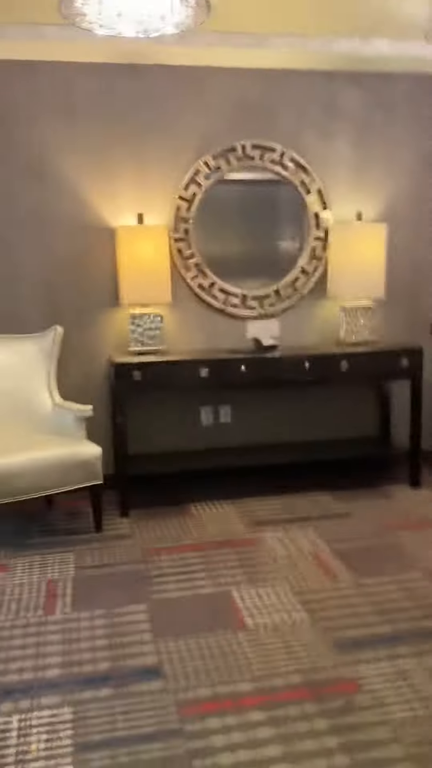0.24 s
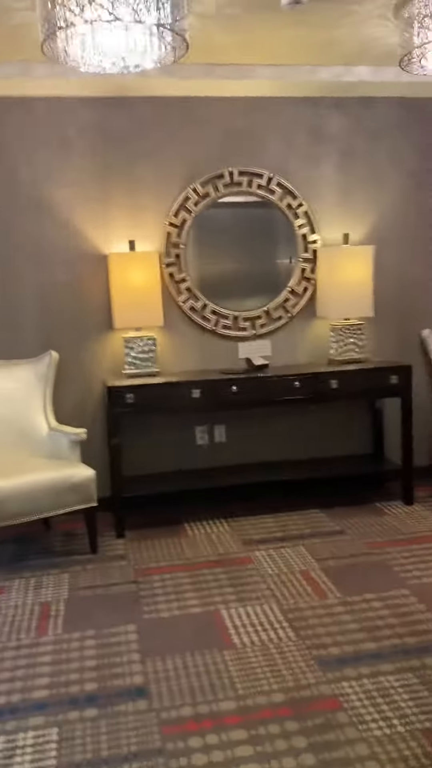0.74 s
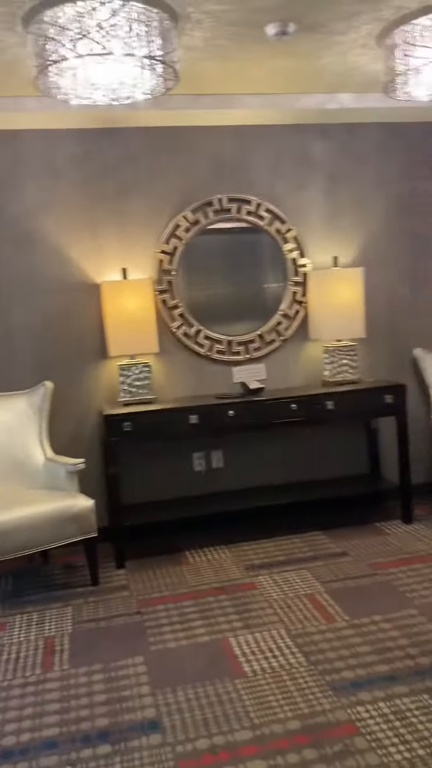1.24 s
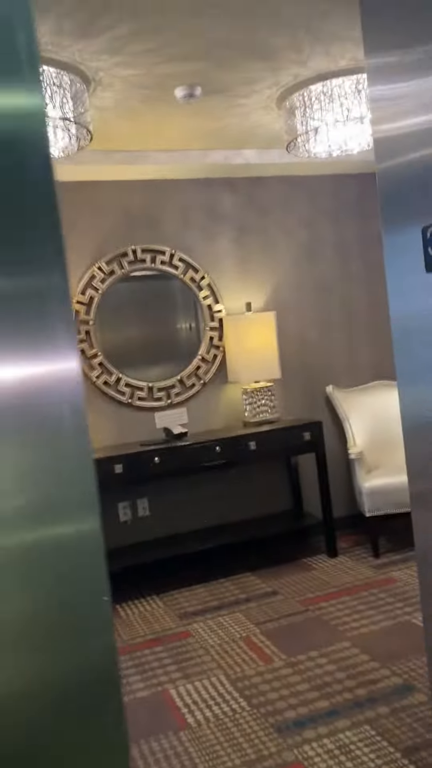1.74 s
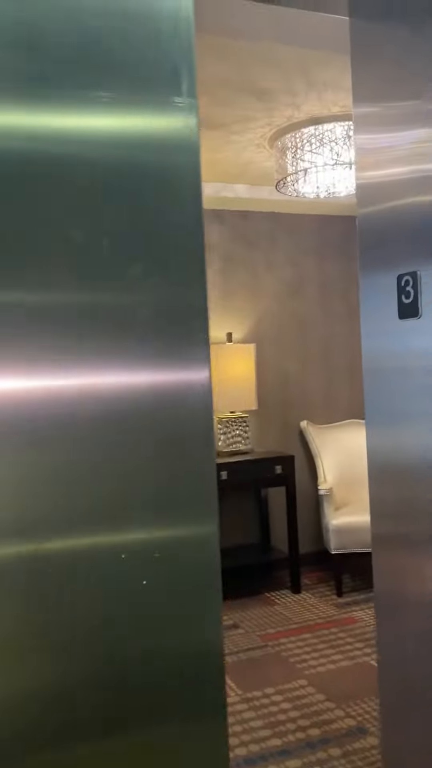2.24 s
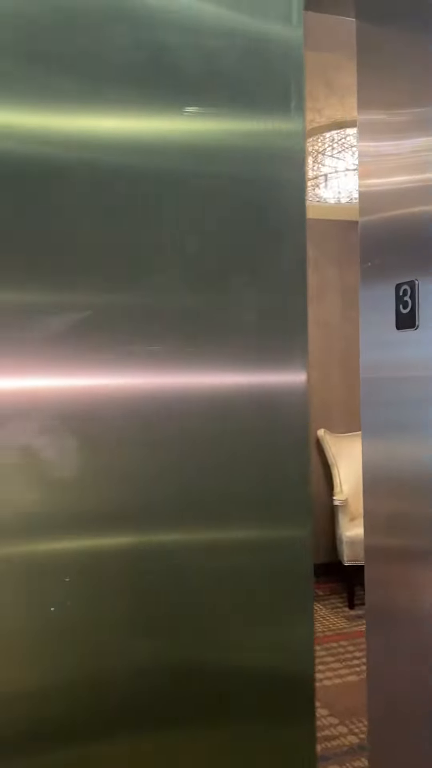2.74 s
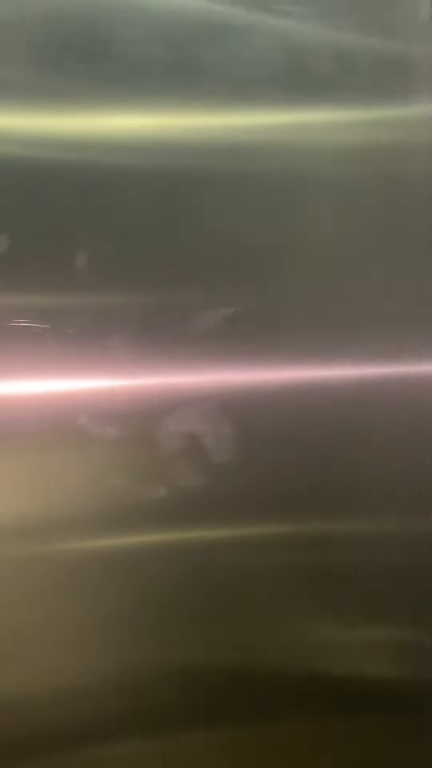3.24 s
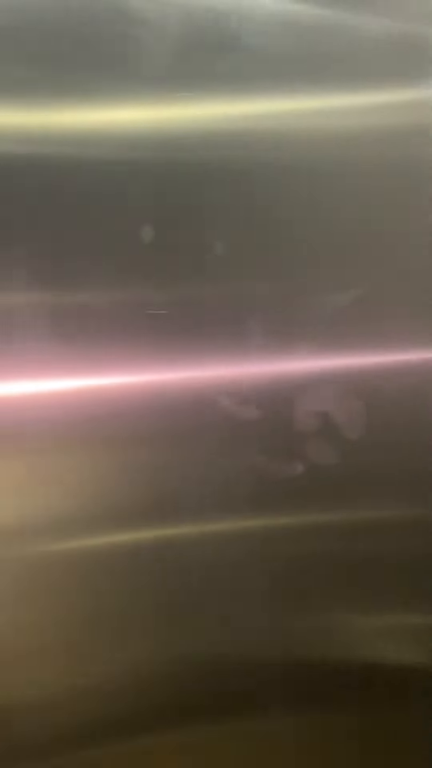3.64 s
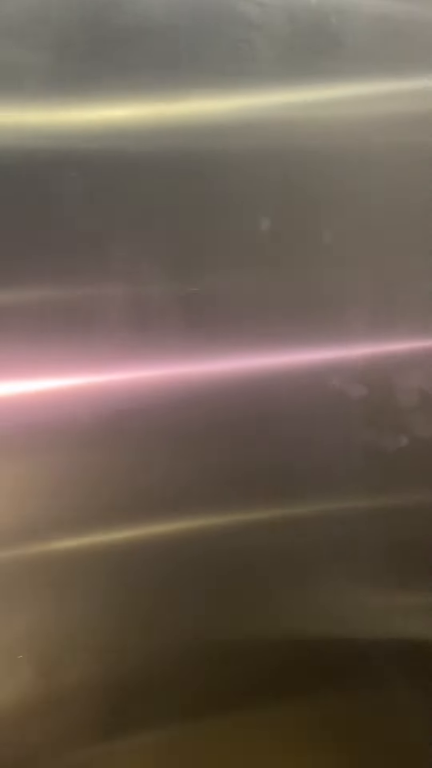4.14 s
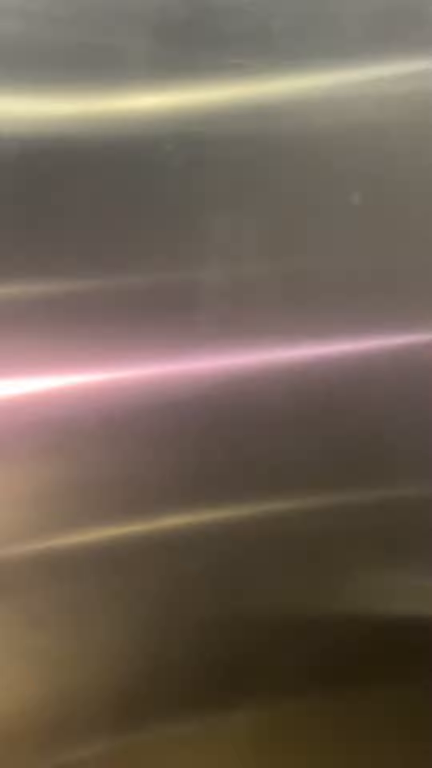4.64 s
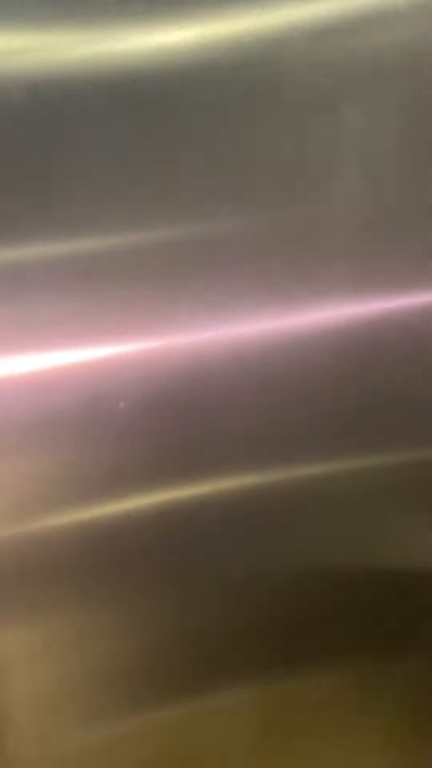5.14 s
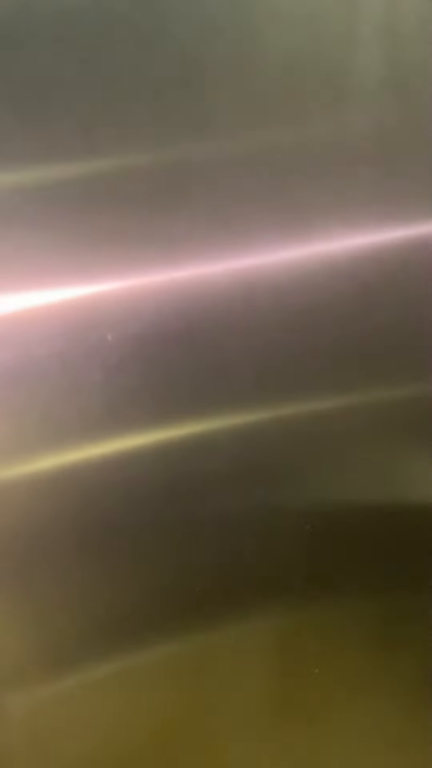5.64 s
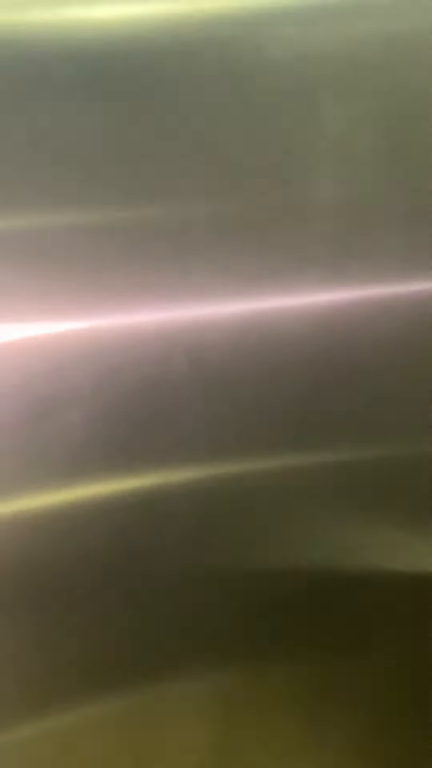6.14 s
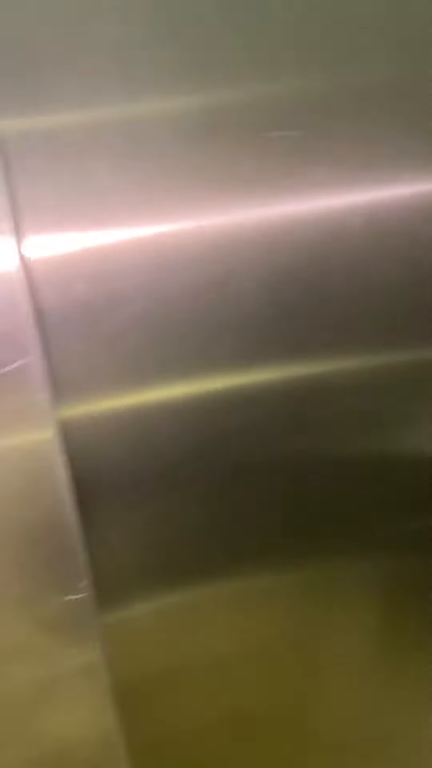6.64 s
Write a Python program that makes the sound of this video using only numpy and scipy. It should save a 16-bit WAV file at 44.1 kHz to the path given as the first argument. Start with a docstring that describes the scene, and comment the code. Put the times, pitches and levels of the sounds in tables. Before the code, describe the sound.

Low fan drone and soft hiss in a lift cabin, cloth rustles and small ticks, dull door bumps, then one sharp metallic clack.

```python
"""Inside a lift car: the ceiling fan hums (blade-rate sines) and blows (coloured noise ringing in the air).
The sliding door rumbles shut along its track (noise shaking resonances, with dull low bumps), then its
latch snaps home (noise crack, ringing panel modes, dying rattle). Clothes rustle as lifts of the hiss,
small parts tick as noise bursts, fingers thud as damped sines near a hand-held two-port microphone."""
import sys
import numpy as np
from scipy import signal
from scipy.fft import rfft, irfft, next_fast_len
from scipy.io import wavfile
from scipy.ndimage import uniform_filter1d

SR = 44100
rng = np.random.default_rng(int(sys.argv[2]) if len(sys.argv) > 2 else 0)


def transcribe(signal):
    """Save signal, clipped to [-1, 1], as a 16-bit WAV file at the path in sys.argv[1]."""
    frames = np.atleast_2d(signal).T
    limited = np.clip(frames, -1, 1)
    pcm = np.round(limited * 32767).astype(np.int16)
    wavfile.write(sys.argv[1], SR, pcm)


N = 303849
T = np.arange(N) / SR


def amp(db):
    """Decibels to gain."""
    return 10 ** (np.asarray(db) / 20)


def evened(x):
    """Scales to rms 1."""
    return x / np.sqrt(np.mean(x ** 2) + 1e-20)


def read(points, hz, axis=1):
    """Reads a column of a table over log frequency."""
    table = np.transpose(points)
    return np.interp(np.log(hz + 1), np.log(table[0] + 1), table[axis])


def curves(table):
    """Every column of a time table, sample by sample."""
    s, *columns = np.transpose(table)
    return [np.interp(T, s, c) for c in columns]


def wander(rate_hz):
    """Smooth random drift of rms 1: 16 sines up to rate_hz, weaker as they get faster."""
    t = T[::64]
    drift = sum(np.sin(2 * np.pi * (f * t + rng.random())) / np.sqrt(f)
                for f in np.geomspace(rate_hz / 20, rate_hz, num=16))
    return np.interp(T, t, evened(drift))


def swell(middle_s, length_s):
    """A smooth hump of height 1."""
    start = max(round((middle_s - length_s / 2) * SR), 0)
    part = slice(start, round((middle_s + length_s / 2) * SR))
    out = np.zeros(N)
    out[part] = np.cos(np.pi * (T[part] - middle_s) / length_s) ** 2
    return out


def noise(shape, size, patchy_db, tilt_db=0., hinge_hz=1000., span_octaves=1.):
    """Two unrelated noise fields of one colour with drifting patches; tilt_db moves the part above the hinge."""
    hop = size // 4
    frames, hz = N // hop + 5, np.fft.rfftfreq(size, 1 / SR)
    a, b, c, d, patch = rng.standard_normal((frames, len(hz), 5)).T
    patch = uniform_filter1d(patch, size=7, axis=0)
    patch = evened(uniform_filter1d(patch, size=9, axis=1))
    tilt = np.interp(np.arange(frames) * hop, np.arange(N), tilt_db + np.zeros(N))
    upper = np.clip(np.log2(hz / hinge_hz + 1e-9) / span_octaves, 0, 1)
    outside = (hz < shape[0][0]) | (hz > shape[-1][0])
    base = amp(np.where(outside, -120, read(shape, hz)))
    gain = base[:, None] * amp(patchy_db * patch + upper[:, None] * tilt)
    spectra = np.array([a + 1j * b, c + 1j * d]) * gain
    out = signal.istft(spectra, nperseg=size, noverlap=size - hop)[1][:, :N]
    return out / np.linalg.norm(base)  # near rms 1 before the tilt


def resonate(x, hz, width_hz):
    """A steep fixed resonance of gain 1: shift to 0 Hz, low-pass with a double pole, shift back."""
    turn, r = np.exp(2j * np.pi * hz * T[:x.shape[-1]]), np.exp(-np.pi * width_hz / SR)
    slow = signal.lfilter([(1 - r) ** 2], [1, -2 * r, r * r], x / turn)
    return 2 * (turn * slow).real


def modes(table, shake):
    """Noise ringing in a set of resonances, rms 1."""
    return evened(sum(amp(db) * evened(resonate(shake, hz, w)) for hz, w, db in table))


def steadied(x, window_s, share):
    """Evens out part of the chance swell of a narrow noise, so that it sounds driven."""
    power = uniform_filter1d(x ** 2, round(window_s * SR))
    return evened(x / (abs(power) + 1e-3) ** (share / 2))


def draught():
    """Fan air roaring in the car's low modes, hiss lifted by rustling cloth, and microphone hiss."""
    # fan draught colour: hz, relative_db_per_hz
    air_colour = [(76, -33.5), (130, -6), (156, -9.5), (274, -0.5), (330, -4.5), (401, -5.5), (477, -2.5),
                  (528, -4), (642, -16), (779, -18), (909, -26.5), (1060, -22.5), (1210, -30), (1500, -38),
                  (1950, -63.5), (3300, -120)]
    # draught strength: time_s, level_db
    air_level = [(0, -39.5), (.8, -39), (1.6, -36.5), (2.8, -35.5), (3.2, -38), (3.7, -34), (4.8, -34),
                 (5.1, -35.5), (6.5, -36.5), (6.89, -37.5)]
    # air resonances of the car: pitch_hz, width_hz, relative_db
    car_modes = [(240.7, 11, -9), (293.4, 8.4, -7), (363.9, 14, -10), (435, 33, -12), (593, 11, -15),
                 (699.2, 18, -16), (782, 15, -28), (1054, 61, -22.5)]
    # air hiss and rustle colour: hz, relative_db_per_hz
    hiss_colour = [(900, -10.5), (1400, 0.5), (2200, -0.5), (3200, -1.5), (4800, -9.5), (6000, -13.5),
                   (7500, -18), (10000, -24), (12500, -25.5), (14400, -27.5), (15500, -45)]
    # hiss before the rustles: time_s, level_db, brightness_db
    hiss_level = [(0, -58, -7), (1.2, -56, -2), (1.9, -55, -5), (2.6, -55, -2), (4.4, -56, -6.5),
                  (5.2, -57, -0.5), (6.1, -55.5, -11.5), (6.3, -58, -14.5), (6.89, -58.5, -6)]
    # cloth rustles: middle_s, length_s, lift_db, brightening_db
    rustles = [(.42, 0.29, 4.5, 6.5), (0.573, 0.062, -0.5, 9), (0.733, 0.085, 3.5, 2),
               (0.832, 0.11, 0.5, 10), (1.01, 0.24, 4, 2.5), (1.33, 0.23, 1.5, 1), (2.238, 0.47, 3, 3),
               (2.433, 0.4, 1.5, 4), (3.33, 0.066, 0.5, 11.5), (3.566, 0.17, 1, 4), (3.78, 0.27, 0, 9),
               (4.16, 0.32, 3, 8), (4.334, 0.052, 1.5, 6), (4.437, .08, -1, 5), (4.602, 0.23, 4.5, 6.5),
               (5.35, 0.27, 3, 3), (5.555, 0.46, 1, 5), (5.86, 0.19, 5.5, 6.5)]
    # microphone hiss colour: hz, relative_db_per_hz
    self_noise = [(4000, -3.5), (7000, -0.5), (11000, -4.5), (14000, -6.5), (15500, -20.5)]

    roar = noise(air_colour, size=2048, patchy_db=2.03, tilt_db=4, hinge_hz=518.0, span_octaves=0.14)
    roar = roar + amp(-6.5) * modes(car_modes, rng.standard_normal((2, N)))
    roar = amp(curves(air_level)[0]) * roar

    level_db, bright_db = curves(hiss_level)
    for middle_s, length_s, lift_db, brightening_db in rustles:
        hump = swell(middle_s, length_s)
        level_db = level_db + lift_db * hump
        bright_db = bright_db + brightening_db * hump
    bright_db = bright_db + 1.5 * wander(12.)  # treble flicker
    hiss = noise(hiss_colour, size=256, patchy_db=1.57, tilt_db=bright_db, hinge_hz=4800.0, span_octaves=0.34)
    return roar + amp(level_db) * hiss + amp(-84.0) * noise(self_noise, size=256, patchy_db=5.0)


def machine_tones():
    """Thin whines from the drive: sines wavering in level and phase, each faded in over 0.11 s."""
    # start_s, pitch_hz, level_db
    whines = [(6.3, 10993, -94.5), (6.45, 2050, -69.5)]
    out = np.zeros(N)
    for start_s, hz, db in whines:
        size = np.sqrt(2) * amp(db + 1.2 * wander(9.)) * np.clip((T - start_s) / 0.11, 0, 1)
        out += size * np.sin(2 * np.pi * hz * T + .7 * wander(25.0))
    return out


def fan_tone():
    """Blade-passing tone; overtones swell as the microphone crosses standing waves, each with its port lead."""
    # time_s, level_db of overtones 1, 2, 3 (before wavering)
    overtone_levels = [(0, -43, -68, -64), (.17, -42, -56, -68), (.3, -35, -45.5, -63),
                       (.55, -31, -42.5, -66), (.88, -30, -41.5, -70), (1.0, -33.5, -41, -54.5),
                       (1.21, -35, -48.5, -57), (1.29, -43.5, -47, -68), (1.42, -45.5, -46, -60),
                       (1.6, -46, -39.5, -62), (2.05, -45, -38.5, -71), (2.2, -45, -41.5, -72),
                       (2.38, -39.5, -43, -66), (2.55, -38.5, -51, -62), (2.72, -36.5, -70, -58),
                       (2.95, -37.5, -47, -53), (3.15, -34, -49, -53), (3.45, -40, -49.5, -51),
                       (3.6, -38, -51, -62), (3.8, -42, -44.5, -58), (4.1, -38.5, -36, -61),
                       (4.35, -42, -37, -60), (4.6, -45, -40.5, -56.5), (4.85, -54.5, -46.5, -57.5),
                       (5.02, -59, -44, -52), (5.15, -64, -42.5, -50.5), (5.27, -65, -37, -53),
                       (5.45, -49, -36.5, -57), (6.4, -52.5, -37, -63), (6.6, -36.5, -37, -57),
                       (6.89, -45, -34, -60)]
    # blade rate: time_s, rate_hz
    blade_rate = [(0, 261.45), (4.5, 261.5), (5.2, 262.1), (6.89, 262.05)]
    # per overtone, before then after the turn: left_lead_rad, left_minus_right_db, left_lead_rad, left_minus_right_db
    overtone_ports = [(0.14, -1.5, -0.39, -1), (-0.54, -4, 0.68, 0.5), (-1.5, -3, 2, 10),
                      (2.5, 2.5, -2.8, -2)]
    turn_s = (2.3, 5.7)  # the hand turns the microphone: from, to

    turns_rad = 2 * np.pi * np.cumsum(curves(blade_rate)[0]) / SR
    side = np.array([[.5], [-.5]])
    levels = curves(overtone_levels) + [-66 + 3 * wander(2.7)]  # the fourth only flickers
    out = np.zeros((2, N))
    for k, (level_db, port) in enumerate(zip(levels, overtone_ports), 1):
        lead_rad, pan_db, late_lead_rad, late_pan_db = port
        phase = k * (turns_rad + 0.22 * wander(11.)) + 2 * np.pi * rng.random()
        waver_db = 1.0
        if k > 2:  # the upper overtones wobble more
            phase = phase + 0.81 * wander(15.)
            waver_db += 1.5
        level_db = level_db + waver_db * wander(14.)
        if k > 1:
            level_db = level_db + 1.5 * wander(45.)  # quick flutter
        pan = side * np.interp(T, turn_s, [pan_db, late_pan_db])
        lead = side * np.interp(T, turn_s, [lead_rad, late_lead_rad])
        out += np.sqrt(2) * amp(level_db + pan) * np.sin(phase + lead)
    return out


def ticks():
    """Ticks and scuffs: short noisy bursts, each in its own band, with a tail from the metal walls."""
    # start_s, level_db (before strike and grit), centre_hz, width_hz, rise_s, t60_s
    tick_list = [(0.2735, -46, 3300, 4000, .0006, 0.011), (.3200, -53, 4860, 3500, 0.0016, 0.16),
                 (.321, -49, 2500, 2500, .001, .03), (.395, -52.5, 2760, 1500, .002, 0.2),
                 (.415, -54.5, 2950, 600, 0.0039, .25), (.5514, -70, 9950, 3970, 0.0009, 0.17),
                 (0.698, -56, 2800, 3000, .001, 0.057), (.694, -53, 3100, 900, .001, 0.11),
                 (.702, -51.5, 3050, 1100, 0.0022, 0.25), (.74, -57.5, 3250, 1000, 0.0045, 0.2),
                 (.7214, -69, 9500, 5040, .002, .25), (.800, -59, 8560, 2000, 0.00092, 0.15),
                 (.801, -58, 5800, 3500, .001, .12), (.9344, -69, 9700, 6040, .003, 0.32),
                 (.995, -54.5, 4800, 2500, .002, .08), (1.092, -52, 2990, 1200, .004, 0.3),
                 (1.325, -65, 8460, 1500, .002, .15), (1.398, -51.5, 1610, 600, 0.0044, 0.27),
                 (2.0738, -53.5, 2980, 3960, 0.0022, 0.082), (2.17, -53.5, 4960, 8000, 0.017, 0.25),
                 (2.4414, -59, 8300, 800, 0.0028, .2), (2.849, -59.5, 5200, 2500, .001, .15),
                 (3.32, -64, 7900, 8950, 0.0016, 0.13), (3.739, -52.5, 2500, 3500, 0.012, 0.28),
                 (3.735, -50, 1410, 700, 0.006, 0.59), (3.83, -52, 1490, 600, 0.0046, 0.15),
                 (4.018, -46, 1490, 700, 0.0027, 0.26), (4.018, -49.5, 2200, 800, 0.0025, 0.22),
                 (4.025, -50.5, 2000, 1500, .001, .06), (4.041, -49.5, 2300, 600, 0.0062, 0.25),
                 (4.075, -52, 1660, 900, 0.0055, 0.23), (4.162, -53.5, 2500, 1500, 0.0031, 0.25),
                 (4.179, -53, 4500, 6000, 0.018, 0.22), (4.588, -57, 4200, 1200, .003, 0.68),
                 (4.7983, -58, 9500, 5000, .002, 0.41), (4.832, -46, 1790, 1500, .001, 0.087),
                 (4.851, -47, 1600, 1500, .001, .08), (5.309, -64.5, 9000, 6000, 0.0016, 0.39),
                 (5.31, -52, 3280, 3500, 0.0022, .2), (5.34, -53, 3000, 1800, .002, .15),
                 (5.809, -53.5, 4900, 5900, 0.0041, 0.26), (5.829, -49.5, 3540, 6000, 0.011, 0.35)]
    strike_db, strike_decay_s = 0.5, 0.0014  # hard first touch
    grit_db, grit_grain_s = 2, .004  # scuffs catch unevenly
    out, t = np.zeros((2, N)), T[:SR // 3]
    for start_s, db, hz, width_hz, rise_s, t60_s in tick_list:
        burst = evened(resonate(rng.standard_normal((2, len(t))), hz, width_hz))
        burst = steadied(burst, 0.0033, 0.48)
        grit = evened(uniform_filter1d(rng.standard_normal(len(t)), round(grit_grain_s * SR)))
        burst = burst * amp(grit_db * grit - grit_db ** 2 / 9)  # second term offsets the added power
        strike = strike_db * np.exp(-abs(t - rise_s) / strike_decay_s)
        envelope = amp(db - 60 * t / t60_s + strike) * np.clip(t / rise_s, 0, 1)
        at = round(start_s * SR)
        out[:, at:at + len(t)] += envelope * burst
    return out


def thuds():
    """Fingers on the housing: a damped 620 Hz sine, stronger at the left port."""
    # start_s, level_db (before tap decay), pan_db (split between the ports, ahead of the right port's cut)
    finger_taps = [(0.277, -25.5, 6.5), (0.829, -29, 6), (1.729, -33, 6)]
    out, t = np.zeros((2, N)), T[:1200]
    tap = np.sin(2 * np.pi * 620 * t) * np.exp(-t / 0.0038) * np.clip(t / 0.00049, 0, 1)
    right_cut = [[1], [.2]]
    for start_s, db, pan_db in finger_taps:
        at = round(start_s * SR)
        pan = np.array([[pan_db], [-pan_db]]) / 2
        out[:, at:at + len(t)] += amp(db + pan) * right_cut * tap
    return out


def door():
    """Track rumble, panel and roller resonances shaken by noise, and dull bumps on the way."""
    # time_s, rumble_db, panel_boom_db, roller_drone_db
    door_levels = [(0, -54, -56.5, -45.5), (.7, -49, -49, -48), (1.05, -46.5, -47.5, -42.5),
                   (1.6, -44, -52.5, -45), (2.2, -42, -47, -42.5), (3.3, -41.5, -44, -44.5),
                   (3.9, -38, -36.5, -36), (4.15, -42.5, -40.5, -44.5), (4.85, -40, -37.5, -36.5),
                   (5.14, -45, -46, -48.5), (5.22, -40, -44, -42.5), (5.4, -39.5, -45, -42),
                   (5.5, -37, -45.5, -42.5), (5.58, -40.5, -39.5, -36.5), (5.95, -39, -44.5, -46),
                   (6.05, -46.5, -42.5, -45.5), (6.89, -44, -68.5, -46)]
    # rumble colour: hz, relative_db_per_hz
    rumble_colour = [(10, -25), (18, -13.5), (25, -8.5), (33, -1), (41, 2.5), (52, -1.5), (65, 0), (82, -2),
                     (105, -4), (135, -21), (200, -61)]
    # panel resonances: pitch_hz, width_hz, relative_db
    boom_modes = [(113, 12.2, -3), (122.5, 5.9, -9.5)]
    # roller resonances: pitch_hz, width_hz, relative_db
    drone_modes = [(174.9, 19.2, -0.28), (211.7, 31, -0.72)]
    # dull bumps of door and car: middle_s, peak_db, pitch_hz, length_s
    bump_list = [(0.287, -36, 165, 0.1), (0.997, -38, 38, 0.18), (1.37, -37.5, 40, 0.19),
                 (1.691, -29, 174.4, 0.14), (1.71, -35, 118, 0.16), (2.078, -35, 116.2, 0.52),
                 (2.149, -31, 209, 0.1), (2.44, -31.5, 42, 0.1), (2.453, -35.5, 120, 0.16),
                 (2.948, -36.5, 113, 0.28), (3.196, -33, 113.3, .15), (3.686, -29, 112.5, 0.12),
                 (3.868, -22, 110, 0.053), (4.005, -27, 114, 0.076), (4.2, -27.5, 114.7, 0.068),
                 (4.482, -31.5, 105, 0.17), (4.66, -22.5, 255, .03), (4.79, -28.5, 300, 0.022),
                 (5.22, -25, 62, 0.067), (5.276, -24, 66.1, 0.072), (5.31, -26, 106, 0.1),
                 (5.357, -25.5, 63.95, .085), (5.383, -31, 92, 0.065), (5.437, -33, 95, .08),
                 (5.453, -31.5, 63, .1), (5.49, -30.5, 170, 0.1), (5.768, -27.5, 109.7, .14),
                 (6.006, -34.5, 180, 0.053), (6.589, -34.5, 202.5, 0.097)]

    rumble_db, boom_db, drone_db = curves(door_levels)
    shake = rng.standard_normal((2, N))
    boom = steadied(modes(boom_modes, shake), 0.082, .5)
    drone = steadied(modes(drone_modes, shake), 0.066, 0.23)
    rumble = steadied(noise(rumble_colour, size=4096, patchy_db=1.5), 0.037, 0.23)
    flutter = wander(30.)
    bumps = np.zeros(N)
    for middle_s, db, hz, length_s in bump_list:
        phase = 2 * np.pi * (hz * T + rng.random()) + 0.39 * flutter
        bumps += amp(db) * swell(middle_s, length_s) * np.sin(phase)
    return amp(rumble_db) * rumble + amp(boom_db) * boom + amp(drone_db) * drone + bumps


def latch():
    """A bright snap and a dense dying rattle; thin modes ring at once, the panel body swells just after."""
    # rattle colour: hz, relative_db_per_hz
    rattle_colour = [(750, -20.5), (950, -1.5), (1250, 5.5), (1550, 1), (2500, -4), (3900, -12.5),
                     (4700, -9.5), (6200, -15), (7300, -8), (8200, -4), (9000, -15), (12000, -23),
                     (15600, -36)]
    # door panel resonances: pitch_hz, width_hz, relative_db
    panel_modes = [(275, 72, -11.5), (429, 120, -3.5), (599, 110, 3), (778, 88, -6.5), (890, 40, -4.5),
                   (939, 42, -4), (1033, 46, -9.5), (1202, 130, -14.5), (1433, 23, -2.5), (1487, 20, -3.5),
                   (1623, 31, 1), (1740, 25, -1), (1780, 27, -16), (2103, 34, -8), (2300, 44, -2.5),
                   (2558, 44, -1.5), (2630, 45, -4.5), (2970, 53, -11), (3310, 140, -6.5), (3530, 48, -7),
                   (3620, 80, -7.5), (3830, 48, -15), (4130, 80, -16.5), (4650, 130, -9.5), (4808, 40, -16),
                   (5540, 110, -14)]
    # parts of the first snap: pitch_hz, width_hz, level_db, t60_s
    snap_parts = [(1590, 1300, -32.5, 0.02), (1500, 250, -36, 0.1), (3500, 460, -41, .06),
                  (4620, 900, -27.5, 0.05), (8800, 5600, -38, 0.053)]
    # the latch bounces and strikes the panel again: time_s, lift_db
    bounces = [(4.641, 7.5), (4.66, 8.5), (4.681, 3), (4.701, -5), (4.712, 2), (4.732, 2), (4.755, 1),
               (4.792, 7.5), (4.82, 2.5), (4.85, -0.5)]
    start_s, rise_s, rattles_s, lasts_s = 4.628, 0.016, 0.1, 0.38
    bounce_decay_s, rattle_bounce_share = 0.0028, .6
    crack_after_s, crack_decay_s, crack_band_hz = 0.0018, 0.0014, (2000, 11000)  # the hard touch

    t = np.maximum(T - start_s, 0)
    early = np.clip(1 - t / rise_s, 0, 1)
    late = np.maximum(t - rattles_s, 0)
    level_db = -30 - 5.5 * early - 70.5 * t - 4.5 * np.clip(late / 0.01, 0, 1)  # drops as the rattle stops
    bright_db = 4 + 9 * early - 73.5 * np.minimum(t, lasts_s)
    body_db = -28.5 - 18 * early - 23.5 * t - 47 * late
    on = np.clip(t / 0.0024, 0, 1) * np.clip((lasts_s - t) / 0.052, 0, 1)
    rattle = noise(rattle_colour, size=256, patchy_db=1.8, tilt_db=bright_db, hinge_hz=4000., span_octaves=1.1)

    start = round(start_s * SR)
    part = slice(start, start + SR // 2)
    now = T[part]
    shake = rng.standard_normal((2, SR // 2))
    lift_db = sum(db * (now > s) * np.exp(-np.maximum(now - s, 0) / bounce_decay_s) for s, db in bounces)
    struck = shake * amp(lift_db)
    body = steadied(modes([m for m in panel_modes if m[0] < 1300], struck), 0.013, .5)
    ring = steadied(modes([m for m in panel_modes if m[0] >= 1300], struck), .01, .3)

    snap = np.zeros_like(shake)
    for hz, width_hz, db, t60_s in snap_parts:
        snap += amp(db - 60 * t[part] / t60_s) * steadied(resonate(shake, hz, width_hz), 0.0018, 0.57)
    band = signal.butter(N=2, Wn=crack_band_hz, btype="band", fs=SR, output="sos")
    crack = evened(signal.sosfilt(band, shake))
    since_crack = t[part] - crack_after_s
    snap += amp(-20) * np.exp(-since_crack / crack_decay_s) * (since_crack > 0) * crack

    out = amp(level_db) * rattle
    out[:, part] *= amp(rattle_bounce_share * lift_db)
    out[:, part] += amp(level_db[part] - 2.5) * ring + amp(body_db[part]) * body + snap
    return on * out


def ports(field):
    """Two unrelated fields become left and right: alike in the bass, shifted in phase in the treble."""
    # all three: hz, unrelated_part_db, left_lead_rad, left_minus_right_db
    bass_ports = [(25, -44, 0, 0), (60, -38, 0, -.1), (125, -32, 0, -.3), (190, -27, 0, -.8),
                  (300, -24, -.15, -1.2)]
    # middle range, same columns
    middle_ports = [(400, -12, .1, -3), (515, -6, 0.59, -2.5), (1020, -2.5, 0.74, 3.5), (1920, -5, 0.38, 0),
                    (2560, -4.5, 1.75, -0.3), (3860, -1.5, 1.74, 0.5), (4400, -8.5, 0.94, -1),
                    (5600, -3.5, 0.75, 1), (6340, -9.5, 2.13, 0.5)]
    # treble, same columns
    treble_ports = [(7000, -24, 3.14, 0), (7900, -24, 3.14, 0), (8500, -12, 4.5, 0), (9700, -24, 6.28, 0),
                    (11600, -24, 6.28, 0), (12600, -24, 9.42, 0), (14400, -24, 9.42, 0),
                    (15300, -15, 12.4, 0)]
    size = next_fast_len(N)
    hz, (a, b) = np.fft.rfftfreq(size, 1 / SR), rfft(field, size)
    table = bass_ports + middle_ports + treble_ports
    apart = amp(read(table, hz))
    lead_rad, pan_db = read(table, hz, axis=2), read(table, hz, axis=3)
    half = amp(pan_db / 2) * np.exp(.5j * lead_rad)
    pair = np.array([(a + apart * b) * half, (a - apart * b) / half]) / np.sqrt(1 + apart ** 2)
    return irfft(pair, size)[:, :N]


def scene():
    """Everything in the car as it reaches the two ports."""
    whines = machine_tones() * [[1], [0]]  # in the shared field only
    diffuse = draught() + whines + ticks() + door() + latch()
    return ports(diffuse) + fan_tone() + thuds()


def record(dry):
    """Band limit of the recorder: linear-phase low-pass at 15.8 kHz."""
    lowpass = signal.firwin(511, 15800, window=("kaiser", 9), fs=SR)
    return signal.oaconvolve(dry, lowpass[None], "same")


dry = scene()
out = record(dry)
transcribe(out)
```